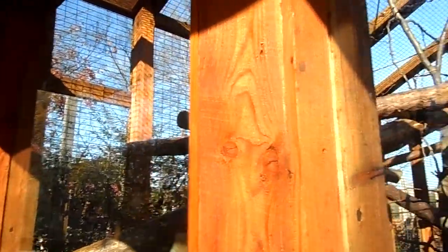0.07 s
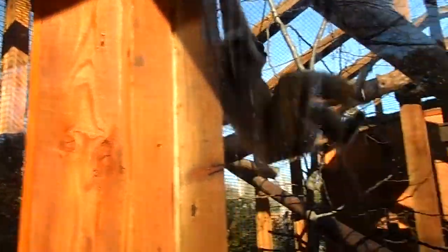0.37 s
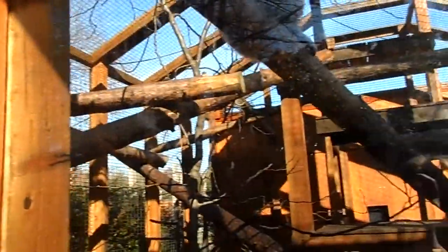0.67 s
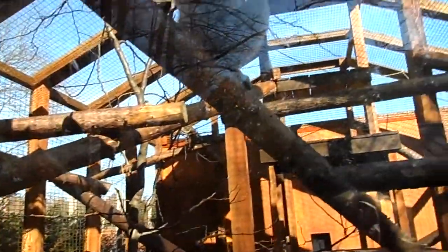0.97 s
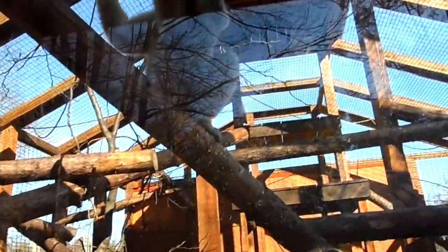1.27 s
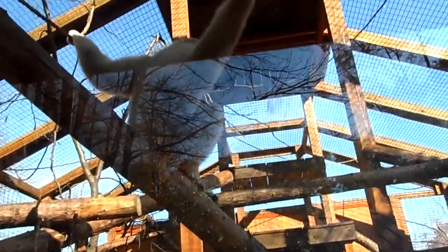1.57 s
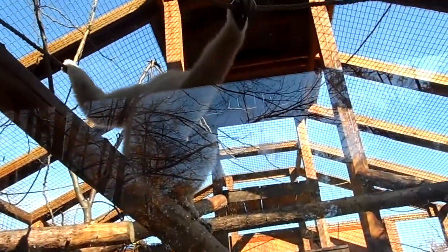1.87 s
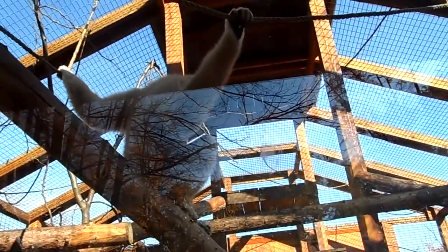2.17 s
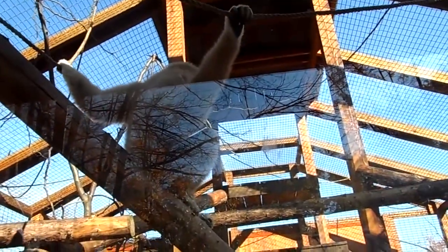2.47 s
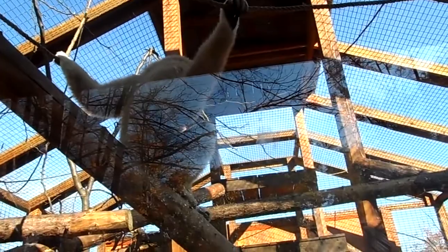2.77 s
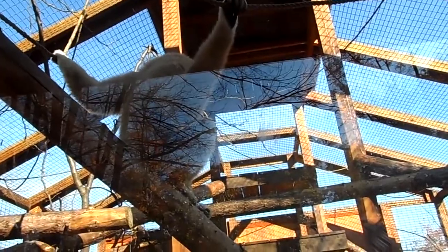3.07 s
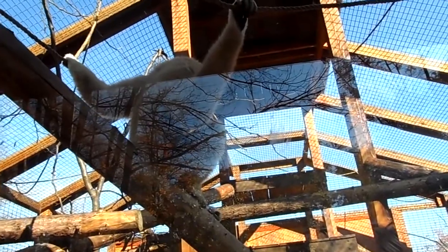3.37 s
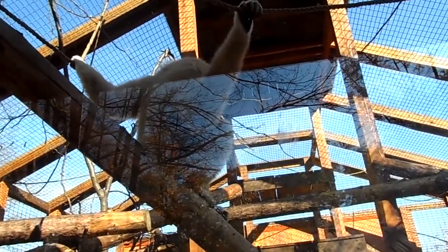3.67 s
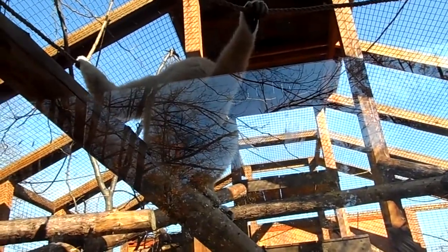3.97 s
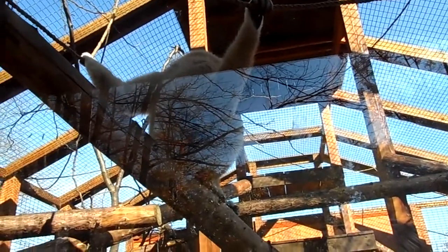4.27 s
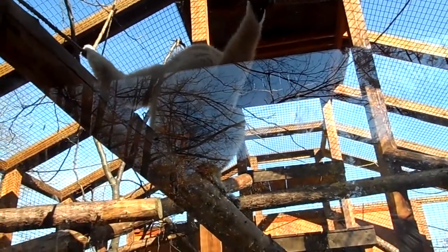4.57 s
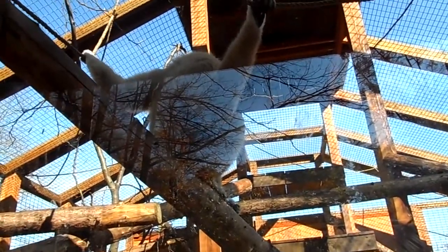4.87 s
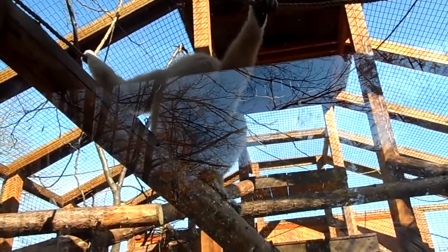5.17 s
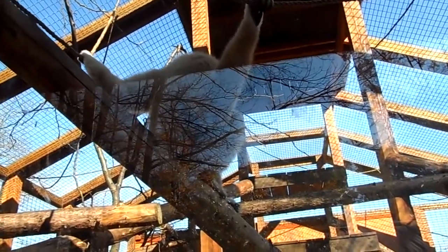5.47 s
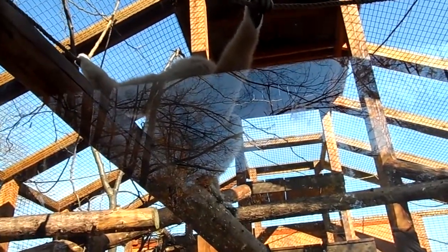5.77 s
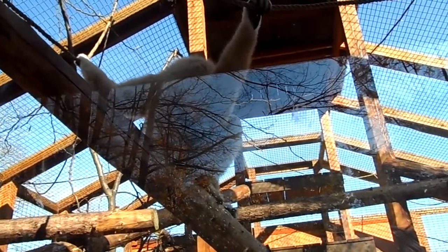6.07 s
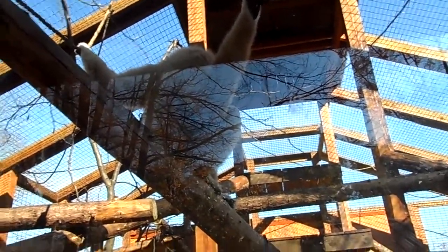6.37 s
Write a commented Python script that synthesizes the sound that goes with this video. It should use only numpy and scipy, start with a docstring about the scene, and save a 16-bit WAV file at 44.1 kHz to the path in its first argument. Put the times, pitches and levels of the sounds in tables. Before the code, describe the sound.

A gibbon calls close to the microphone in a roofed timber and glass enclosure. Three short whoops slide upward, then come two long, quavering hoots that sink slowly in pitch, and a softer last whoop. The voice is clear and almost pure, slightly smeared by short echoes. A thin whistle follows the first whoop and a small bird chirps far off, over faint outdoor rumble and hiss.

```python
"""A gibbon whoops close to the microphone in a roofed timber and glass enclosure: three rising whoops,
then two long, sinking, quavering hoots and a soft last whoop. Its vocal folds give an almost pure
tone that beats against its own reflections, which smear every fast glide. A thin whistle follows the
first whoop and a small bird chirps far off. Under it all lie a faint outdoor rumble, microphone hiss
and the camera's electrical buzz."""
import sys
import numpy as np
from scipy import signal
from scipy.fft import rfft, irfft, next_fast_len
from scipy.io import wavfile

SR = 44100
rng = np.random.default_rng(int(sys.argv[2]) if len(sys.argv) > 2 else 0)


def inscribe(sig):
    """Save sig as 16-bit PCM at rate SR to the path in sys.argv[1].

    A 1-D sig is mono; a 2-D sig holds one channel per row.
    Samples are clipped to [-1, 1] before scaling.
    """
    pcm = np.round(np.clip(np.atleast_2d(sig).T, -1, 1) * 32767)
    wavfile.write(sys.argv[1], SR, pcm.astype(np.int16))


N = 287091
TIME = np.arange(N) / SR


def from_db(db):
    """Decibels to gain."""
    return 10 ** (np.asarray(db) / 20)


def rms_one(x):
    """Scale to an rms of 1."""
    return x / np.sqrt(np.mean(x ** 2) + 1e-20)


def in_time(rows):
    """Join the rows of a curve by straight lines: one array for each column after the time."""
    times, *columns = np.transpose(rows)
    return [np.interp(TIME, times, column) for column in columns]


def at_hz(points, hz):
    """Read a spectrum in dB on a log-frequency axis."""
    freq, db = np.transpose(points)
    return np.interp(np.log(np.maximum(hz, 1)), np.log(freq), db)


def butter(x, hz, kind, order=2):
    """Causal Butterworth filter."""
    return signal.sosfilt(signal.butter(order, hz, kind, fs=SR, output="sos"), x)


def drift(rate_hz):
    """Smooth random wander with an rms of 1."""
    knots = rng.standard_normal(int(N / SR * 2 * rate_hz) + 2)
    return rms_one(np.interp(TIME * 2 * rate_hz, np.arange(len(knots)), knots))


def ramps(start, end, rise_s, fall_s):
    """Straight rise from 0 at the start, hold at 1, straight fall to 0 at the end."""
    return np.clip(np.minimum((TIME - start) / rise_s, (end - TIME) / fall_s), 0, 1)


def soft_gate(start, end, attack_s, release_s):
    """Rounded attack, hold and release."""
    return np.sin(np.pi / 2 * ramps(start, end, attack_s, release_s)) ** 2


def rumble_and_hiss(level_db=-61, rumble_hz=200):
    """Smooth microphone hiss over a slowly swelling outdoor rumble."""
    # spectrum of the steady noise: f/Hz, relative level/dB
    spectrum = [(12, -47), (20, 4.5), (47, -1), (103, -3), (148, -5.5), (315, -9), (416, -11.5),
                (649, -14.5), (705, -14.5), (767, -13), (834, -15), (2330, -23), (15500, -32.5)]
    # swell of the rumble: t/s, level change/dB
    rumble_swell = [(0, 1), (1, 0.5), (1.8, 2.5), (3, 2), (4.2, 1), (5.2, 2.5), (6.5, 2.5)]
    hz = np.arange(N // 2 + 1) * SR / N
    noise = rms_one(irfft(rfft(rng.standard_normal(N)) * from_db(at_hz(spectrum, hz)), N))
    swell = from_db(in_time(rumble_swell)[0]) - 1
    return from_db(level_db) * (noise + swell * butter(noise, rumble_hz, "low", order=1))


def camera_buzz(frame_hz=29.997, tick_hz=740, start_s=0.0038, end_s=0.0142):
    """The camera's electronics leak a burst of tiny, uneven ticks and hiss once a frame."""
    in_frame = TIME % (1 / frame_hz)
    busy = (in_frame > start_s) & (in_frame < end_s)
    cycles = np.floor(np.cumsum(tick_hz * (1 + 0.018 * drift(40))) / SR)
    ticks = np.diff(cycles, prepend=0) * busy * from_db(-2 * np.tanh(drift(300)))
    hiss = rng.standard_normal(N) * busy
    return butter(from_db(-77) * rms_one(ticks) + from_db(-80) * rms_one(hiss), 2000, "high", order=1)


def swing(rows, fade_s=np.inf):
    """Regular swings of a held note, half as deep after fade_s."""
    out = np.zeros(N)
    for start, end, rate_hz, depth in rows:
        age = np.maximum(TIME - start, 0)
        gate = soft_gate(start, end, attack_s=0.029, release_s=0.042)
        out += depth / (1 + age / fade_s) * gate * np.sin(2 * np.pi * rate_hz * age)
    return out


def gibbon_call(curve, voice, shut_mouth_db=-17, flutter_db=2, shimmer_db=2):
    """One call: clean vocal-fold harmonics on a gliding pitch, with a trace of rasp."""
    # level pulses of the long hoots: start t/s, end t/s, rate/Hz, depth/dB
    quavers = [(3.358, 4.08, 9.33, 5.5), (4.559, 5.25, 5.78, 3)]
    # vibrato from the top of each hoot: start t/s, end t/s, rate/Hz, depth/Hz
    vibratos = [(2.832, 3.96, 10.49, 17.2), (4.533, 5.25, 9.32, 10.1)]
    # colour of the 2nd and of the 3rd harmonic: f/Hz, level/dB re fundamental before the voice's trim
    second_colour = [(1150, -20), (1360, -16.5), (1520, -6.5), (1630, -3.5), (1730, -11.5), (1830, -14.5),
                     (2050, -25.5), (2600, -30)]
    third_colour = [(1850, -42), (2100, -29), (2300, -25.5), (2500, -30), (2750, -31.5), (3300, -28),
                    (3800, -18)]
    # throat and mouth colour of the higher harmonics: f/Hz, level/dB re 3rd before the voice's trim
    throat = [(2600, -9), (3150, -12), (3600, -10), (3900, -23), (4400, -19), (4650, -6), (4950, -13),
              (5500, -14), (6000, -18), (6400, -22), (7300, -22), (9000, -36)]
    second_db, third_db, upper_db, rasp_db, opening_s, closing_s = voice
    start, end = curve[0][0], curve[-1][0]
    gate = soft_gate(start, end, attack_s=0.054, release_s=0.04)
    on = gate > 0
    pitch, level_db = [column[on] for column in in_time(curve)]
    quaver_db = swing(quavers)[on]
    vibrato_hz = swing(vibratos, fade_s=0.71)[on]
    waver = 1 + 0.00328 * drift(20)[on] + 0.0012 * drift(170)[on]
    pitch = (pitch + vibrato_hz) * waver
    phase = 2 * np.pi * np.cumsum(pitch) / SR
    # overtones follow the opening of the mouth; the 2nd swings against the quaver
    mouth_closed = 1 - ramps(start, end, opening_s, closing_s)[on]
    overtone_db = level_db + shut_mouth_db * mouth_closed
    first = from_db(level_db + quaver_db)
    second = from_db(overtone_db + second_db + at_hz(second_colour, 2 * pitch) - 0.31 * quaver_db)
    third = from_db(overtone_db + third_db + at_hz(third_colour, 3 * pitch))
    tone = first * np.sin(phase) + second * np.sin(2 * phase) + third * np.sin(3 * phase)
    # the high harmonics follow the third, coloured by the throat, each with a slight flutter
    for k in range(4, 9):
        harmonic_db = upper_db + at_hz(throat, k * pitch) + flutter_db * drift(14)[on]
        tone += third * from_db(harmonic_db) * np.sin(k * phase)
    # turbulence passes the folds once a cycle
    air = rms_one(butter(butter(rng.standard_normal(on.sum()), 1200, "high"), 6000, "low"))
    rasp = third * from_db(rasp_db) * air * (1 + np.cos(phase))
    out = np.zeros(N)
    out[on] = gate[on] * from_db(shimmer_db * drift(30)[on]) * (np.sqrt(2) * tone + rasp)
    return out


def gibbon_song():
    """Six calls, each with its own glide and voice; the long hoots pulse in level."""
    # one curve a call: t/s, pitch f/Hz, level of the fundamental/dB
    curves = [
        [(0.23, 591, -45), (0.292, 629, -47), (0.324, 712, -43.5), (0.358, 882, -50), (0.386, 921, -62)],
        [(1.01, 649, -45.5), (1.086, 690, -40.5), (1.115, 715, -46), (1.151, 861, -35.5), (1.169, 898, -47.5),
         (1.251, 894, -51)],
        [(1.56, 573, -51.5), (1.625, 675, -39), (1.665, 701, -40), (1.695, 763, -39), (1.757, 768, -37.1),
         (1.818, 774, -34.5), (1.901, 832, -38), (1.936, 869, -33), (2.002, 1019, -35), (2.05, 1269, -39.5),
         (2.104, 1282, -46.5)],
        [(2.702, 702, -41), (2.8, 766, -38.5), (2.852, 896, -35), (2.953, 903, -37.5), (2.996, 861, -32.5),
         (3.081, 823, -39.5), (3.194, 812, -41), (3.438, 783, -48), (3.601, 776, -48), (3.899, 769, -45.5),
         (3.97, 760, -53.5), (4.089, 768, -62)],
        [(4.416, 572, -45), (4.48, 644, -42), (4.553, 840, -40), (4.662, 802, -40.0), (4.708, 773, -44),
         (4.803, 747, -38.5), (4.944, 765, -42), (4.97, 794, -47), (5.106, 765, -42.5), (5.216, 748.6, -46),
         (5.333, 744, -39.5), (5.46, 739.4, -61.8)],
        [(5.806, 528, -54.7), (5.925, 668, -44), (5.984, 709, -46), (6.032, 731, -54), (6.069, 729, -41),
         (6.167, 772, -54.5)],
    ]
    # one voice a call: trim/dB of the 2nd, the 3rd and the higher harmonics, rasp level/dB re 3rd,
    # mouth opening time/s, mouth closing time/s
    voices = [(-2, -7, -3, -16, 0.14, .016), (-2, -2.5, 8.5, -3.5, 0.15, .07),
              (-0.5, 3, -3.5, -23, 0.098, .016), (-1, 0, 0, -19, 0.05, 0.21), (0, -1, -4, -15, 0.08, 0.32),
              (-1, 1, -3, -16, 0.08, 0.15)]
    return sum(gibbon_call(curve, voice) for curve, voice in zip(curves, voices))


def enclosure(x, direct, wet_db, t60_s=0.47, wood_damping_hz=8000, paths=12):
    """Direct sound and echoes circling between glass, roof and walls; the highs die sooner."""
    # scattering by beams and branches: delay/s, share sent round again
    beams = [(.0031, .6), (.0073, .6)]
    size = next_fast_len(N + SR)
    hz = np.arange(size // 2 + 1) * SR / size
    decay_s = t60_s / (1 + hz / wood_damping_hz)
    echoes = 0
    for k, round_trip_s in enumerate(np.geomspace(0.009, 0.053, paths)):
        trip = from_db(-60 * round_trip_s / decay_s) * np.exp(-2j * np.pi * hz * round_trip_s)
        echoes = echoes + (-1) ** k * trip / (1 - trip) / np.sqrt(paths)
    # beams thicken each echo without colouring it
    for delay_s, share in beams:
        trip = np.exp(-2j * np.pi * hz * delay_s)
        echoes = echoes * (trip - share) / (1 - share * trip)
    return irfft(rfft(x, size) * (direct + from_db(wet_db) * echoes), size)[:N]


def scatter(x, t60_s, build_s):
    """Diffuse reflections from trees and buildings, swelling and then dying away."""
    t = TIME[:SR]
    tail = rng.standard_normal(SR) * from_db(-60 * t / t60_s) * (1 - np.exp(-t / build_s))
    return signal.fftconvolve(x, rms_one(tail) / np.sqrt(SR))[:N]


def thin_whistle():
    """A weak, slightly unsteady whistle between the first two whoops."""
    # the rising note: t/s, pitch f/Hz, level/dB
    curve = [(.81, 1270, -73), (.85, 1346, -72), (.885, 1423, -60.5), (.91, 1410, -72), (.935, 1494, -67),
             (.97, 1500, -80)]
    pitch, level_db = in_time(curve)
    phase = 2 * np.pi * np.cumsum(pitch * (1 + 0.01 * drift(80))) / SR
    gate = soft_gate(curve[0][0], curve[-1][0], attack_s=0.01, release_s=0.0091)
    return gate * from_db(level_db) * np.sqrt(2) * np.sin(phase)


def bird(warble=0.087):
    """A small bird's short downward sweeps, made burry by a fast wobble in pitch."""
    # chirps: t/s, length/s, start f/Hz, end f/Hz, level/dB
    chirps = [(1.303, 0.073, 4040, 3500, -69), (4.114, 0.075, 3900, 2950, -70),
              (6.235, 0.084, 3950, 3300, -68)]
    out = np.zeros(N)
    for start, length, start_hz, end_hz, level_db in chirps:
        progress = np.clip((TIME - start) / length, 0, 1)
        pitch = (start_hz + (end_hz - start_hz) * progress) * (1 + warble * drift(160))
        envelope = np.sqrt(np.abs(np.sin(np.pi * progress)))
        out += from_db(level_db) * envelope * np.sin(2 * np.pi * np.cumsum(pitch) / SR)
    return out


def scene():
    """One microphone near the gibbon in its enclosure; the far bird arrives scattered."""
    song = gibbon_song()
    near_gibbon = enclosure(song, direct=0.79, wet_db=-8.5)
    # branches and mesh scatter the short waves; the surroundings add a weak long tail
    branches = from_db(-6.5) * scatter(butter(song, 1500, "high"), t60_s=0.25, build_s=0.0039)
    tail = from_db(-21) * scatter(song, t60_s=1.3, build_s=0.05)
    far_bird = from_db(2) * scatter(bird(), t60_s=0.09, build_s=0.002)
    whistle = enclosure(thin_whistle(), direct=0.65, wet_db=-6)
    return (near_gibbon + branches + tail + far_bird + whistle + rumble_and_hiss() + camera_buzz())[None]


def record(dry):
    """The microphone signal is cut steeply above 15.8 kHz."""
    return signal.sosfilt(signal.ellip(12, 0.1, 70, 15800, fs=SR, output="sos"), dry)


dry = scene()
out = record(dry)
inscribe(out)
```